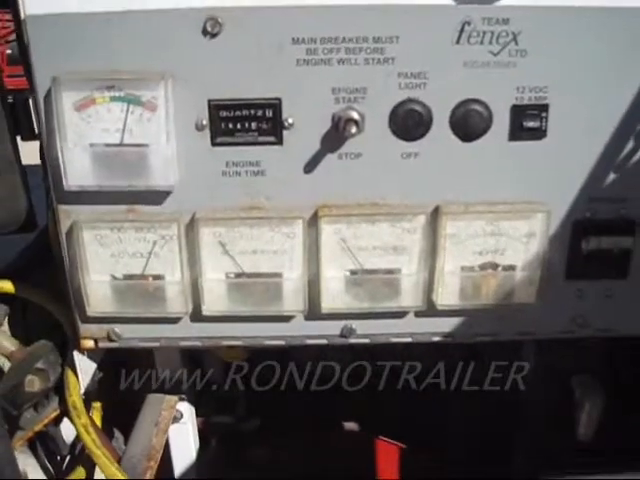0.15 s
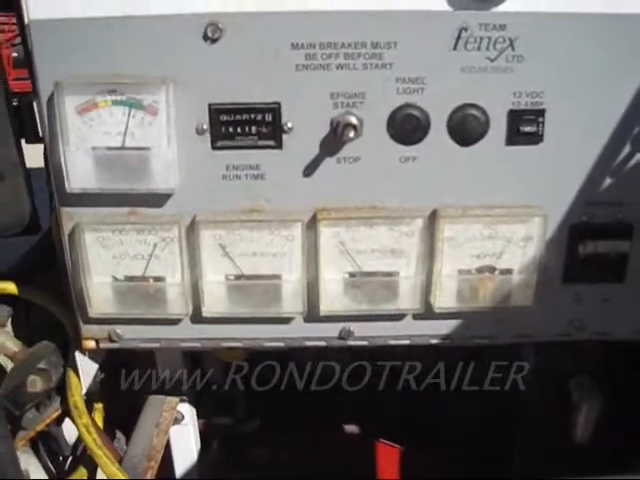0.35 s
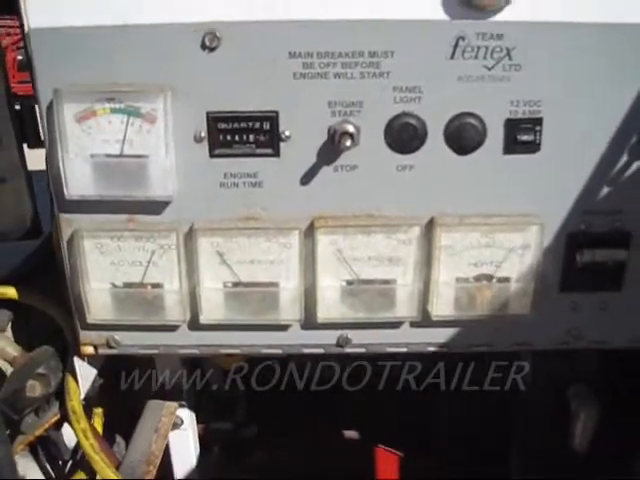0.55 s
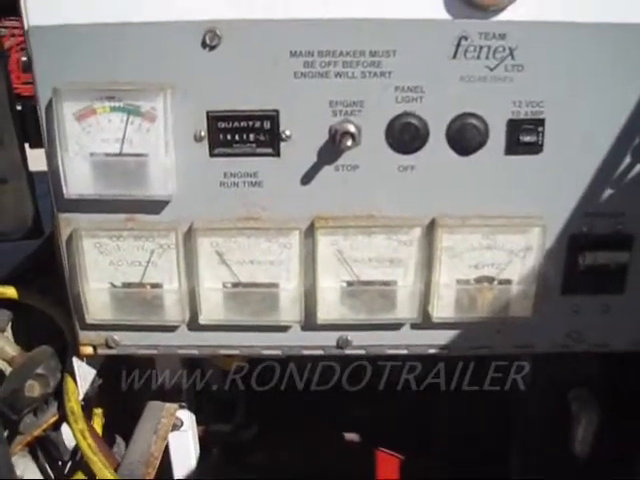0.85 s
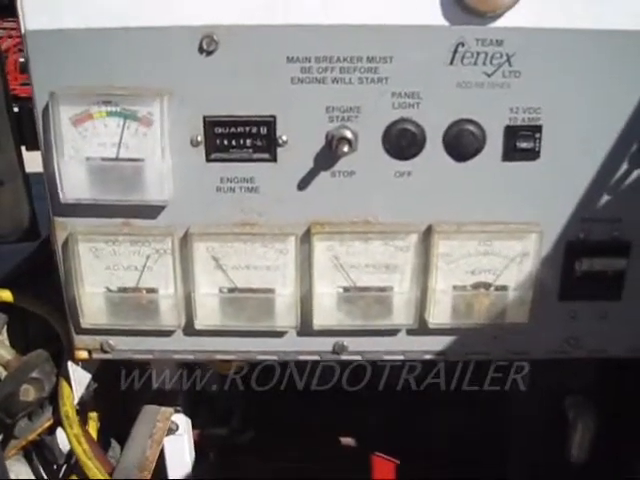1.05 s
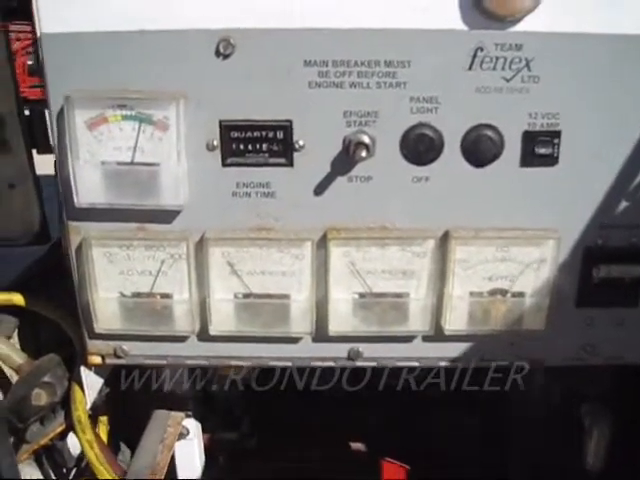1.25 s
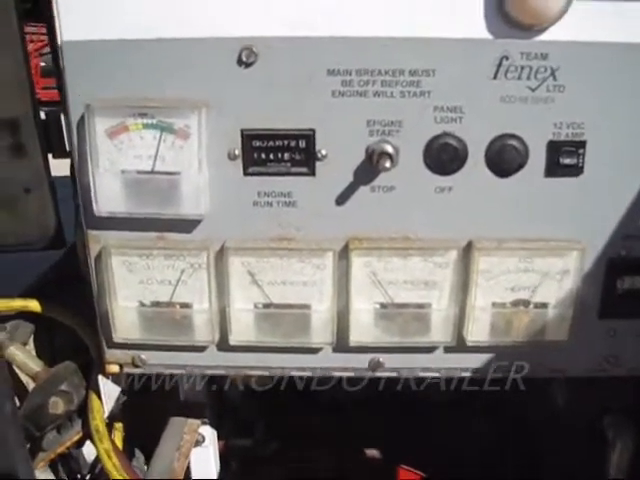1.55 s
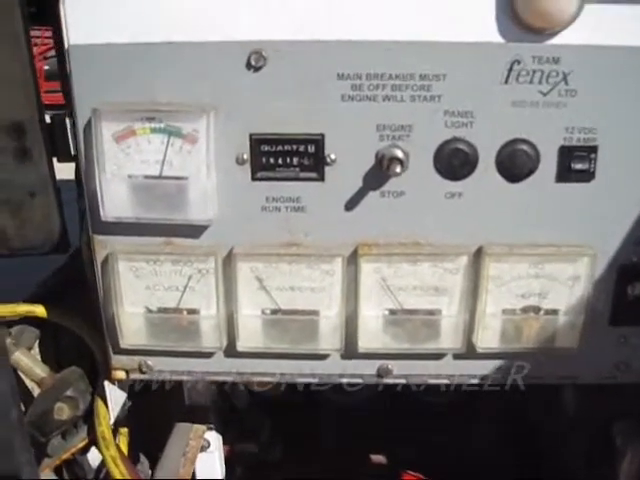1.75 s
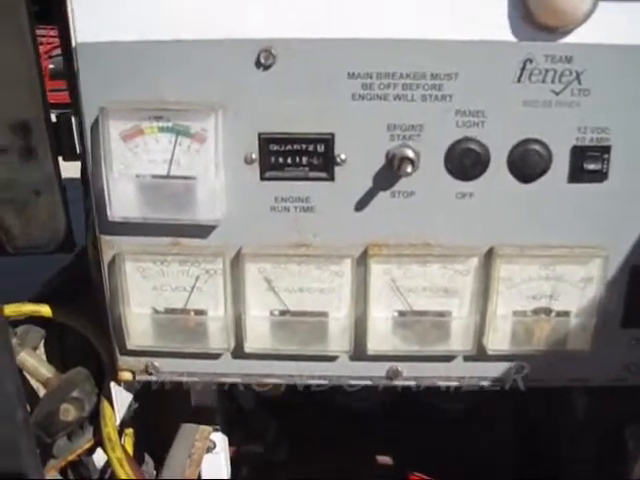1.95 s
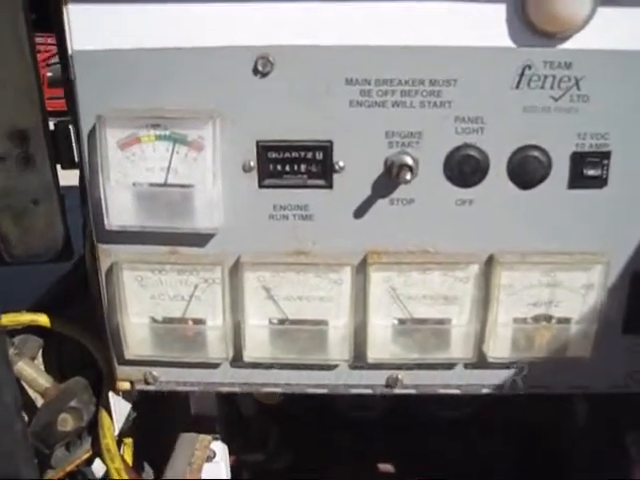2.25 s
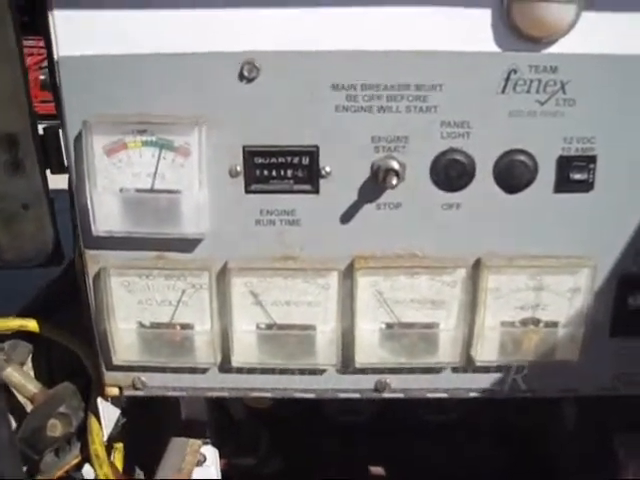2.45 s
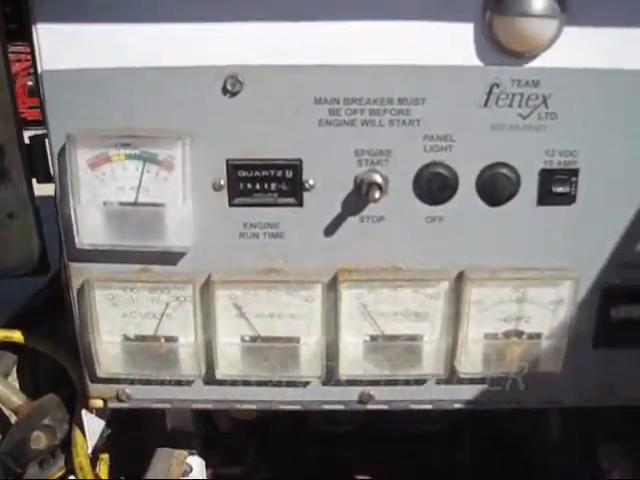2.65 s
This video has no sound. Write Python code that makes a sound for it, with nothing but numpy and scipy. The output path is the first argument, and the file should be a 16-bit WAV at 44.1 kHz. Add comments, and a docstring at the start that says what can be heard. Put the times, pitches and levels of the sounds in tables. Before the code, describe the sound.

A small generator engine drones steadily up close, with low exhaust rumble and rushing blower air

```python
"""A four-cylinder generator engine drones in a vehicle bay, heard close to its control panel.
Its speed surges, then sags under load: hum and harmonics follow the firings, and the harmonics slide
through the resonances of the bay and throb.
Exhaust rumble, blower air and hiss are coloured noise that puffs with each firing, with thin whines on top.
Near the end something small clicks and rattles: bursts of contact noise with ringing modes."""
import sys
import numpy as np
from scipy import signal
from scipy.fft import rfft, irfft
from scipy.io import wavfile

SR = 44100
rng = np.random.default_rng(int(sys.argv[2]) if len(sys.argv) > 2 else 0)


def put_to_file(sound):
    """Save the sound as 16-bit audio at rate SR, in the file named by the first command-line argument."""
    columns = np.atleast_2d(sound).T  # one column per channel
    safe = np.clip(columns, -1, 1)
    whole_steps = np.round(safe * 32767)
    wavfile.write(sys.argv[1], SR, whole_steps.astype(np.int16))


N = 123479
T = np.arange(N) / SR  # time of each sample, s
HZ = np.fft.rfftfreq(N, 1 / SR)  # frequency of each spectral bin

# Engine speed: start_s, firings_per_s
ENGINE_SPEED = [(0.0, 60.44), (0.3, 62.15), (0.6, 63.08), (0.9, 62.49), (1.2, 61.59), (1.5, 60.56),
                (1.8, 59.82), (2.1, 59.29), (2.4, 58.81), (2.8, 58.84)]
# Hum at the firing rate: start_s, level_db (rms)
HUM_LEVEL = [(0, -26), (.45, -28), (.65, -25.5), (.9, -24.5), (1.05, -24.5), (1.5, -22), (1.7, -23.5),
             (2.25, -23), (2.45, -23), (2.8, -24.5)]
# Harmonics of the full four-stroke cycle: multiple, level_db (rms, before bay, wander and loudness)
CYCLE_HARMONICS = [(8, -33), (9, -33.5), (12, -33.5), (16, -30.5), (17, -32), (19, -32), (20, -34),
                   (21, -43), (26, -45), (28, -43.5), (31, -47), (32, -46), (37, -48), (39, -49)]
# Peaks and a null of the bay, as the harmonics meet them: centre_hz, half_width_hz, gain_db
BAY_RESONANCES = [(126, 3.2, 10), (140, 5, 6), (177, 2.5, 4), (287.5, 6, 10.5), (294.5, 2.8, 9),
                  (301.5, 3.5, -13)]
# Loudness at the panel: start_s, harmonics_db, air_db, hiss_db
PANEL_LOUDNESS = [(0, -7, -2.5, -1), (.35, -4.5, -1.5, -1.4), (.5, -3.5, 1.1, 0), (1, -2.5, 1.3, 0.6),
                  (1.25, -5.5, -1, 1.2), (1.45, 1.5, .9, 1.5), (1.75, -0.5, -.9, 0.5), (2.15, 2, 0.4, 0.5),
                  (2.45, 0, -1, 1.7), (2.8, -3, -0.5, 0.3)]
# The rumble swells and sinks: start_s, level_db
RUMBLE_SWELLS = [(0, 0.5), (.2, -2.5), (.5, 1.5), (.65, 3.5), (.8, -1), (1.0, 2), (1.12, 2.5), (1.28, 1),
                 (1.43, 2), (1.6, -0.5), (1.76, -3.5), (1.9, 2.5), (2.02, -7), (2.12, 1.2), (2.3, -4.5),
                 (2.65, 0), (2.8, -7)]
# Exhaust rumble before its swells and the casing: pitch_hz, density_db (per Hz)
RUMBLE_SPECTRUM = [(20, -74), (35, -59), (50, -54), (80, -48.5), (108, -58.5), (135, -49), (172, -45),
                   (215, -44.5), (250, -44), (272, -43.5), (292, -49), (345, -56.5), (500, -90),
                   (1500, -120)]
# Blower air through the casing, before loudness and resonances: pitch_hz, density_db (per Hz)
AIR_SPECTRUM = [(200, -64), (335, -59), (390, -50), (465, -51), (525, -57.5), (620, -58), (790, -64),
                (1000, -65), (1250, -66), (1520, -76), (3000, -110)]
# Hiss of blower and moving parts, before loudness and resonances: pitch_hz, density_db (per Hz)
HISS_SPECTRUM = [(1000, -81), (1550, -77.5), (2000, -74.5), (3000, -81), (3900, -82.5), (4800, -88.6),
                 (5600, -91), (8000, -94.5), (9700, -97.5), (12500, -98), (15500, -97)]
# Narrow resonances of casing and duct, colouring all of this noise: centre_hz, half_width_hz, gain_db
CASING_RESONANCES = [(370, 4.9, 2.5), (494.6, 5.8, 4), (553.5, 21.5, 4), (618, 31, 3.5), (687, 26, 4.5),
                     (767, 13, 4.5), (825, 35, 3.5), (902, 29, 2), (983, 7.1, 5.5), (1276, 16, 1),
                     (2800, 63, 2.5), (4650, 40, -4), (4960, 28, 2)]
# Thin peaks in the blower hiss: centre_hz, half_width_hz, gain_db
HISS_PEAKS = [(8260, 90, 6.5), (8590, 130, 4), (8960, 50, 10), (9810, 50, 7), (10160, 70, 4),
              (10520, 80, 5.5), (11900, 170, 6), (13280, 60, 3), (13570, 80, 5.5), (13830, 70, 4),
              (14310, 80, 5.5), (14600, 90, 6), (14900, 70, 5), (15500, 70, 7)]
# Thin whines of the running machine: pitch_hz, width_hz, level_db (rms, before growth and hiss loudness)
WHINE_TONES = [(1987, 9.3, -65), (3315, 62, -65), (4340, 14, -76), (15135, 22, -70)]
# Clicks of a small hard part: start_s, ring_db (before mode level and favour),
# noise_db (rms before it decays), strongest_hz, spread_octaves
CLICK_EVENTS = [(2.3245, -39, -35.5, 7200, 1.0), (2.330, -35.5, -42, 2300, .3),
                (2.345, -35.5, -44, 2850, .18), (2.355, -44, -46, 2850, .2), (2.363, -43, -45, 2800, .2),
                (2.369, -49, -46, 4000, .8), (2.4035, -39, -37.5, 4500, 1.2)]
# Colour of the contact noise, shape only: pitch_hz, relative_db
CONTACT_SPECTRUM = [(800, -20), (2000, 6), (4600, 1), (6100, -2), (8700, 0), (10500, -2), (15000, -11)]
# Ringing modes of the small part: pitch_hz, relative_db, t60_s
PART_MODES = [(2270, 0, .06), (2780, 0, .09), (2925, -1, .09), (3900, -4, .06), (4540, 0, .07),
              (4880, -6, .05), (5890, -4, .07), (6120, -2.5, .055), (8020, -1, .05), (8700, -2.5, .05),
              (9120, -2.5, .055)]

CYLINDERS = 4
WAVER, WAVER_HZ = 0.08, 8  # wander of each harmonic: share, and the rate where its strength halves
RUMBLE_PULSE, AIR_PULSE, HISS_PULSE = 0.028, 0.12, 0.074  # depth of the puff at each firing
PUFF_TURNS = .13  # puff decay, as a share of the time between firings
FIRING_SPREAD_DB = 0.5
RIPPLE_DB, RIPPLE_HZ = 1.08, 21.95  # fine unevenness from the many echoes of the bay: depth, spacing
WHINE_DB_PER_S = 2  # the whines grow slowly louder
CLICK_SKIRT_DB = 8  # how much weaker a mode rings one spread away
GRIT_DB, GRIT_PER_S = 4, 1200  # unevenness of the contact noise, and its grains per second
CLICK_RISE_S, CLICK_T60_S = .003, .07  # attack of each click, decay of its contact noise
EDGE_HZ, FADE_S = 15800, .005  # band limit, and fade at both ends


def amp(db):
    """Decibels to gain."""
    return 10 ** (np.asarray(db) / 20)


def unit(x):
    """Scales to rms 1."""
    return x / np.sqrt(np.mean(abs(x) ** 2) + 1e-20)


def curve(table):
    """The value columns of a time table, drawn as straight lines through every sample."""
    times, *columns = np.transpose(table)
    return [np.interp(T, times, column) for column in columns]


def colour(x, spectrum, extra_db):
    """Gives white noise a spectrum in dB per Hz, with finer detail on top."""
    hz, db = np.transpose(spectrum)
    spectrum_db = np.interp(np.log(HZ + 1), np.log(hz), db)
    gain = amp(spectrum_db + extra_db) * np.sqrt(SR / 2)
    return irfft(rfft(x) * gain, N)


def band(hz, width):
    """Noise of rms 1 in one narrow resonance."""
    resonance = 1 / (1 + (2 * (HZ - hz) / width) ** 2)
    return unit(irfft(rfft(rng.standard_normal(N)) * resonance, N))


def peaks_db(hz, table):
    """Gain in dB of a set of bell-shaped resonances at the given frequencies."""
    return sum(db * np.exp(-((hz - centre) / width) ** 2) for centre, width, db in table)


def hum(firings):
    """The firing rate itself: a clean, solid low tone."""
    level_db, = curve(HUM_LEVEL)
    return np.sqrt(2) * amp(level_db) * np.cos(2 * np.pi * (firings + rng.random()))


def drone(rate, firings):
    """Harmonics of the engine cycle swell and fade as the speed carries them through the bay's resonances."""
    out = np.zeros(N)
    for multiple, db in CYCLE_HARMONICS:
        per_firing = round(multiple) / CYLINDERS  # the full cycle holds one firing per cylinder
        bay_db = peaks_db(per_firing * rate, BAY_RESONANCES)
        # complex wander moves both strength and phase
        wander = 1 + WAVER * (band(0, 2 * WAVER_HZ) + 1j * band(0, 2 * WAVER_HZ))
        tone = np.exp(2j * np.pi * (per_firing * firings + rng.random()))
        out += amp(db + bay_db) * (wander * tone).real
    return np.sqrt(2) * out


def puffs(firings, depth):
    """White noise that jumps up at each firing and dies away, no two firings quite alike."""
    strengths = amp(FIRING_SPREAD_DB * rng.standard_normal(size=400))
    strength = strengths[firings.astype(int)]
    puff = unit(strength * np.exp(-(firings % 1) / PUFF_TURNS))
    return unit((1 - depth + depth * puff) * rng.standard_normal(N))


def ripple():
    """Fixed random ups and downs of the noise spectrum above 700 Hz, in dB."""
    heights = rng.standard_normal(size=4000)
    uneven = np.interp(HZ / RIPPLE_HZ, np.arange(len(heights)), heights)
    return RIPPLE_DB * unit(uneven) * (HZ > 700)


def rumble(firings, casing_db):
    """Exhaust rumble: low noise puffing with the firings, swelling and sinking."""
    swell_db, = curve(RUMBLE_SWELLS)
    return amp(swell_db) * colour(puffs(firings, RUMBLE_PULSE), RUMBLE_SPECTRUM, casing_db)


def blower_air(firings, casing_db):
    """Rush of blower air: mid-range noise through the casing, pulsing with the firings."""
    return colour(puffs(firings, AIR_PULSE), AIR_SPECTRUM, casing_db)


def blower_hiss(firings, casing_db):
    """Hiss of the blower and the moving parts: bright pulsing noise with thin peaks."""
    detail_db = casing_db + peaks_db(HZ, HISS_PEAKS)
    return colour(puffs(firings, HISS_PULSE), HISS_SPECTRUM, detail_db)


def whine():
    """Faint, unsteady tones made of narrow noise bands, growing slowly louder."""
    growth = unit(amp(WHINE_DB_PER_S * T))
    return growth * sum(amp(db) * band(hz, width) for hz, width, db in WHINE_TONES)


def click(start, ring_db, noise_db, centre_hz, octaves):
    """One contact: a quick burst of noise, and a ring in those modes that the blow favours."""
    age = np.maximum(T - start, 0)

    def favour_db(hz):
        """Weakens what lies away from the centre of the blow."""
        return -CLICK_SKIRT_DB * (np.log2((hz + 1) / centre_hz) / octaves) ** 2

    def fade(t60):
        """Dies away by 60 dB in t60 seconds."""
        return np.exp(-np.log(1000) * age / t60)

    grain_db = GRIT_DB * np.clip(rng.standard_normal(N), -2, 2)
    grit = amp(grain_db)[(T * GRIT_PER_S).astype(int)]
    # the noise is favoured half as sharply as the modes, in dB
    burst = unit(colour(grit * rng.standard_normal(N), CONTACT_SPECTRUM, favour_db(HZ) / 2))
    ring = np.zeros(N)
    for hz, db, t60 in PART_MODES:
        tone = np.sin(2 * np.pi * (hz * age + rng.random()))
        ring += amp(db + favour_db(hz)) * fade(t60) * tone
    attack = np.minimum(age / CLICK_RISE_S, 1)
    return attack * (amp(noise_db) * fade(CLICK_T60_S) * burst + amp(ring_db) * ring)


def scene():
    """Hum, drone and the puffs in the noise all follow the one crankshaft; the clicks lie on top."""
    rate, = curve(ENGINE_SPEED)
    firings = np.cumsum(rate) / SR  # running count
    drone_db, air_db, hiss_db = curve(PANEL_LOUDNESS)
    casing_db = peaks_db(HZ, CASING_RESONANCES) + ripple()
    engine = hum(firings) + amp(drone_db) * drone(rate, firings) + rumble(firings, casing_db)
    air = amp(air_db) * blower_air(firings, casing_db)
    hiss = amp(hiss_db) * (blower_hiss(firings, casing_db) + whine())
    clicks = sum(click(*event) for event in CLICK_EVENTS)
    return (engine + air + hiss + clicks)[None]


def record(dry):
    """The recorder's band limit, a steep low-pass, with a brief fade at both ends."""
    taps = signal.firwin(511, EDGE_HZ, window=("kaiser", 9), fs=SR)
    fades = np.minimum(np.minimum(T, T[-1] - T) / FADE_S, 1)
    return signal.oaconvolve(dry, taps[None], "same") * fades


dry = scene()
out = record(dry)
put_to_file(out)
```